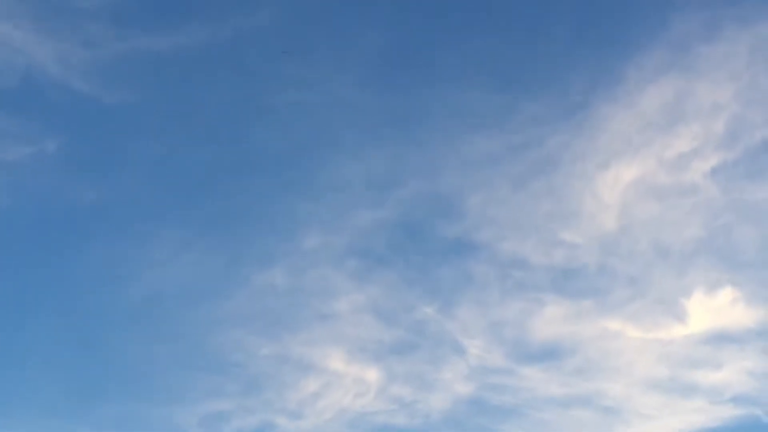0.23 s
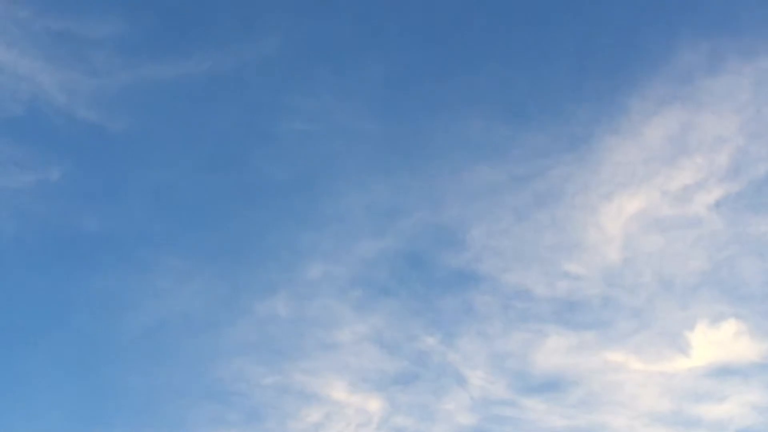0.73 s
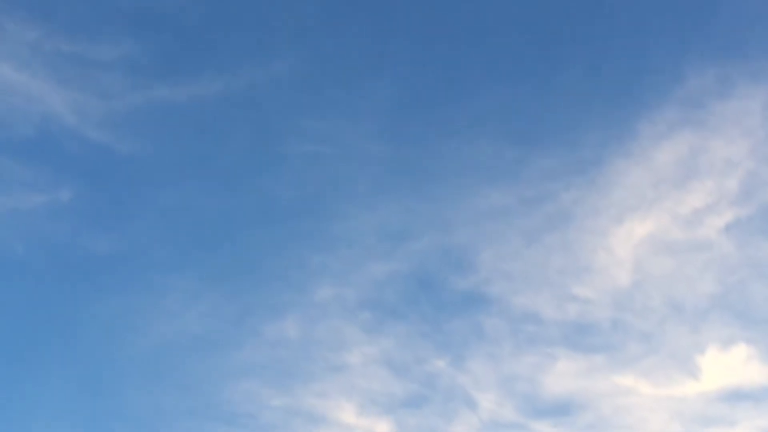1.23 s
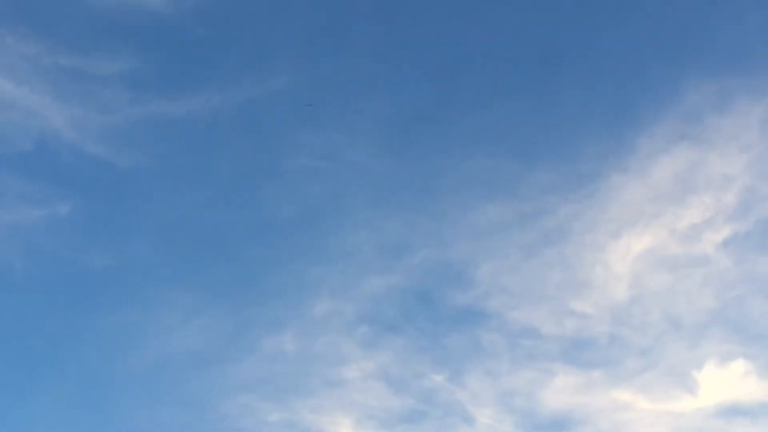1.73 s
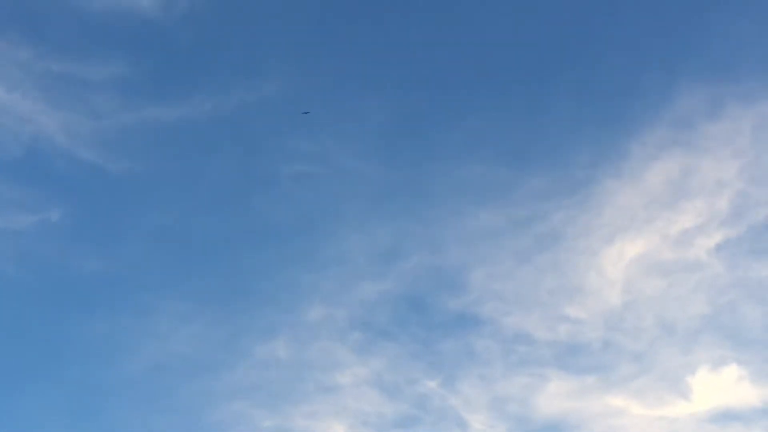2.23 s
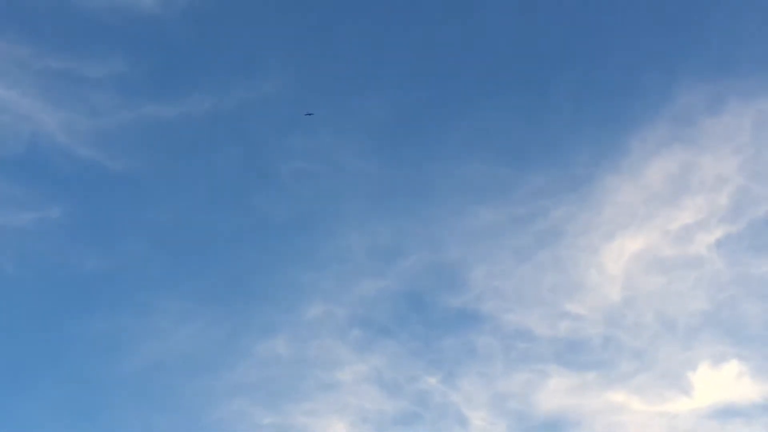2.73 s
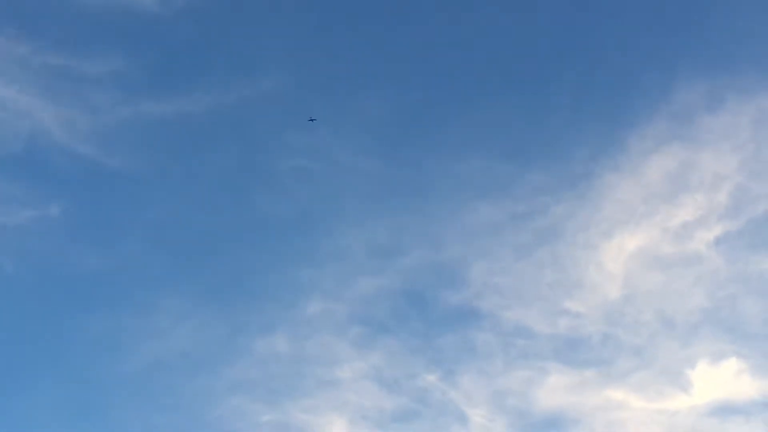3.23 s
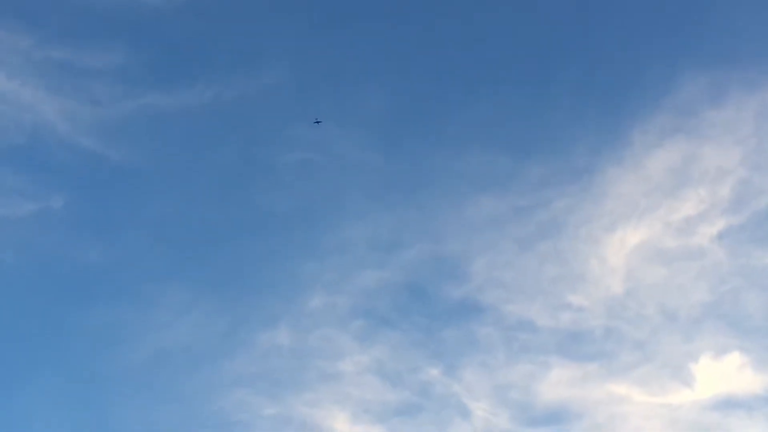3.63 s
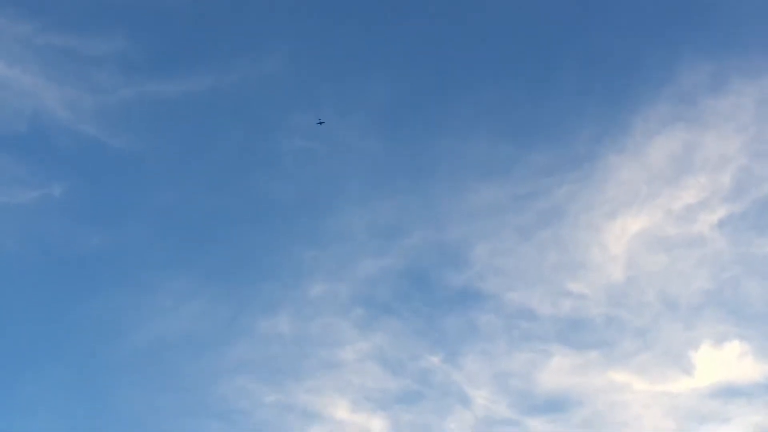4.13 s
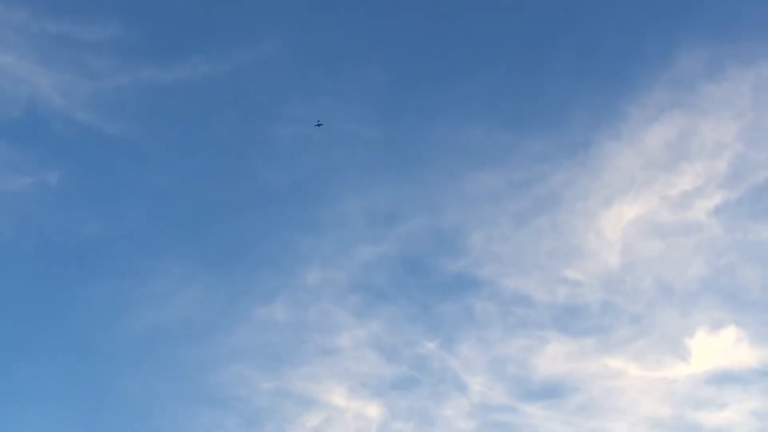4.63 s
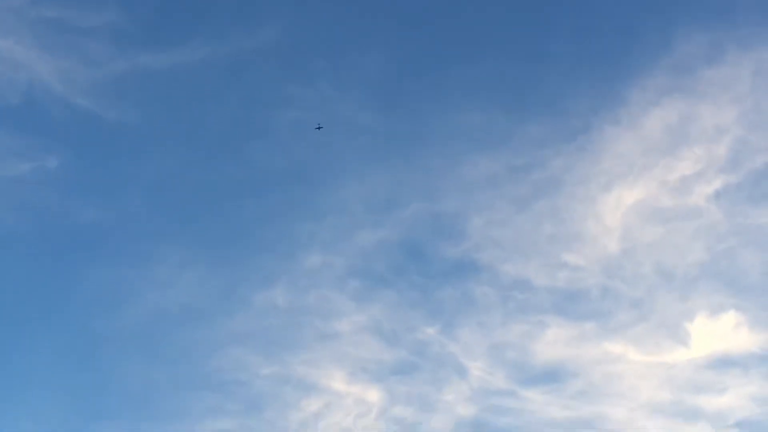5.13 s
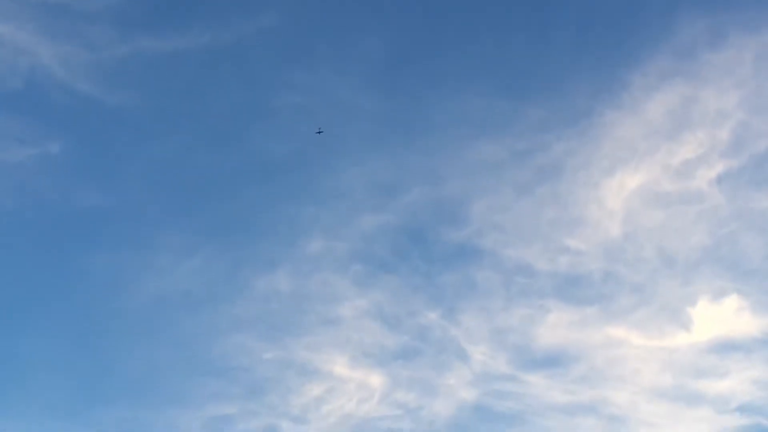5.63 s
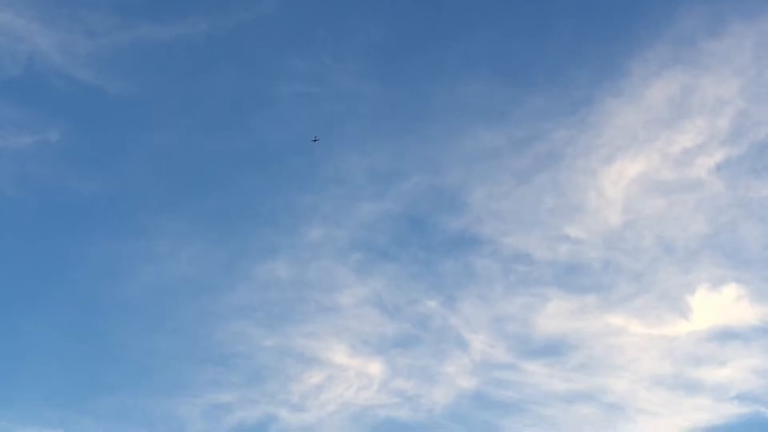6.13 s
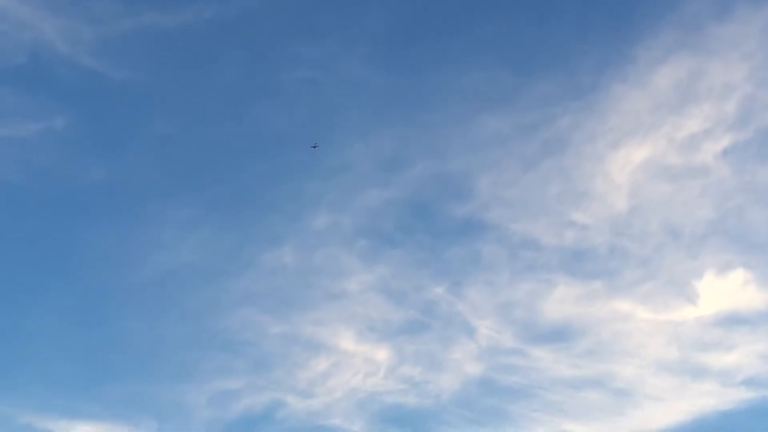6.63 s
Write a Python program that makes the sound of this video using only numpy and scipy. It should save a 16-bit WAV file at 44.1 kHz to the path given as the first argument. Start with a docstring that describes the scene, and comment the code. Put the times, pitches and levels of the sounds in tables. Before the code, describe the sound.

A small piston-engine propeller plane drones high overhead throughout, heard outdoors from the ground. From the start, its low, buzzing note slides steadily down in pitch, over a soft low rush of air from the propeller. Between about 1 and 2.5 seconds the engine swells and turns rougher, with a rapid exhaust crackle, tiny sharp ticks and a sweeping, phasing colour; it is loudest around 2 seconds. From 2.5 to 4.5 seconds the rattling drone wavers in strength, reaching its lowest pitch near 4 seconds. After that the crackle and brightness die away as the plane turns off, leaving a quieter, duller hum that climbs slightly in pitch. The hum is weakest near 6 seconds and comes back a little just before the end, at about 7 seconds. A very faint microphone hiss lies behind it all.

```python
"""Outdoors, far below a six-cylinder, two-blade light aircraft turning high overhead.
Its pitch falls as it swings away, then climbs. Blade and exhaust tones, locked to the shaft, drone
under the crackle of single firings, which uneven air makes come and go. The slipstream rushes low
down, some firings ping or crack out of the drone, and a faint microphone hiss lies above it all."""
import sys
import numpy as np
from scipy import signal
from scipy.fft import rfft, irfft
from scipy.io import wavfile
from scipy.ndimage import uniform_filter1d

SR = 44100
rng = np.random.default_rng(int(sys.argv[2]) if len(sys.argv) > 2 else 0)


def to_wav(s):
    """Save 16-bit WAV."""
    ch = np.atleast_2d(s).T  # columns
    pcm = np.round(np.clip(ch, -1, 1) * 32767)  # PCM
    wavfile.write(sys.argv[1], SR, pcm.astype(np.int16))


N = 303400

# Shaft speed as heard on the ground: (time [s], speed [turns/s]). An order is cycles per turn.
SHAFT_SPEED = [(0.0, 41.898), (0.3, 41.536), (0.6, 40.006), (0.9, 38.609), (1.3, 37.268), (1.7, 35.528),
               (2.1, 34.709), (2.5, 33.76), (3.0, 33.412), (3.5, 33.002), (4.0, 32.829), (4.5, 33.0),
               (5.0, 33.345), (5.5, 33.737), (6.0, 33.963), (6.3, 34.64), (6.6, 34.507), (6.88, 35.143)]
# Firings are sharpest while the pipes face the ground: (time [s], share of noise [0-1])
NOISE_SHARE = [(0, .8), (1.2, .72), (1.6, .5), (2.05, .45), (2.25, .6), (2.5, .45), (4.35, .45), (4.7, .65),
               (6.88, .8)]
# The two lowest tones: (time [s], firing tone at order 3 [dB], blade tone at order 2 [dB])
DRONE = [(0, -37.5, -38), (.17, -38.5, -34.5), (.34, -33, -39.5), (.62, -35.5, -48), (.95, -37, -40.5),
         (1.3, -32, -44), (1.7, -36, -43.5), (2.15, -32, -41.4), (2.5, -34.5, -40), (2.9, -35, -40.5),
         (3.3, -34.5, -45.5), (4, -35.6, -48), (4.5, -38, -47.9), (5, -39, -47.5), (5.55, -44.5, -46.5),
         (6.1, -42.8, -46), (6.5, -38.5, -39.5), (6.88, -39, -41.5)]
# Blade overtones, fading as the propeller turns away: (time [s], order 4 [dB], order 8 [dB])
BLADE_OVERTONES = [(0, -62, -51), (.2, -39.5, -47.5), (.6, -42, -52.5), (1, -36.5, -46),
                   (1.3, -39.5, -39.5), (1.9, -42, -43), (2.4, -51, -50.5), (2.75, -47, -47),
                   (3.1, -50.5, -64), (3.6, -62, -52), (5.9, -72, -53.5), (6.2, -54, -52), (6.88, -57, -55)]
# Overtones of the firing tone: (time [s], order 6 [dB], order 9 [dB], order 12 [dB])
FIRING_OVERTONES = [(0, -44, -56, -55), (.27, -40, -66, -52.5), (.5, -68, -72, -62), (.9, -60, -65.5, -63),
                    (1.3, -52.5, -51, -52), (1.6, -48.5, -45, -45.5), (2, -37.5, -45, -40.5),
                    (2.25, -52.5, -55.5, -47), (2.75, -42.5, -40.5, -50), (3.3, -45, -54.5, -47.5),
                    (3.65, -51.5, -57.5, -51.5), (4, -44.5, -53.5, -50), (4.7, -57.5, -55, -59),
                    (5.4, -54.5, -64, -62), (5.7, -59, -67, -62), (5.95, -62, -81, -81),
                    (6.4, -58, -74, -68.5), (6.88, -60, -79, -64)]
# Other exhaust tones: (order [per turn], offset [dB], lean [0 follows the firing tone, 1 the bark])
EXHAUST_TONES = [(4.5, -14, 0), (7.5, -8.5, 0.31), (10.5, -14, 0.85), (13.5, -11.5, 2), (15, -12.5, 1.67),
                 (16.5, -15.5, 1), (18, -15, 0.99), (19.5, -17, 1.1)]
# Weak tones of unequal cylinders: (order [per turn], level against the firing tone [dB])
UNEVEN_LOW = [(2.5, -27), (3.5, -33.5), (5, -25.5), (5.5, -30), (6.5, -45.5), (7, -26)]
# Weak tones that come and go with the bark: (order [per turn], level against the bark [dB])
UNEVEN_HIGH = [(10, -23.5), (11, -24.5), (11.5, -28.5), (14, -18), (14.5, -33.5), (15.5, -23), (16, -28),
               (17, -22), (17.5, -32), (18.5, -18.5), (21, -28.5), (21.5, -20), (22.5, -20), (24, -25.5),
               (25.5, -27)]
# Strength of each of the six cylinders: (gain [dB])
CYLINDER_DB = (-2, -1, -4, 0, -4.5, 0)
# Colour the pipes give a firing: (frequency [Hz], gain [dB])
PIPE_COLOUR = [(190, -26), (330, -1.5), (367, 2), (396, 15), (431, 5), (500, 13.5), (626, 8.5), (767, -0.5),
               (939, 5), (1140, -5), (1320, -9.5), (1650, -17.5), (2140, -28.5), (4230, -57), (5500, -88.5),
               (9310, -120)]
# Dips that sweep as the aircraft banks and linger as it leaves, a path each: (time [s], centre [Hz])
DIPS = [
    [(1.05, 1410), (1.2, 1965), (1.3, 2650), (1.37, 3300), (1.46, 3820)],
    [(1.38, 1196), (1.5, 1434), (1.56, 1930), (1.62, 2670), (1.67, 3400)],
    [(1.58, 1360), (1.68, 1750), (1.77, 2020), (1.83, 3170)],
    [(1.94, 2830), (2.03, 1930), (2.1, 1260), (2.2, 906), (2.45, 873)],
    [(4.65, 480), (6.88, 463)],
    [(5.25, 790), (6.88, 770)],
    [(4.85, 1210), (5.75, 1148)],
    [(4.6, 1940), (5.2, 1844)],
]
# Bright streaks beside the dips, a path each: (time [s], centre [Hz])
RIDGES = [
    [(1.18, 1380), (1.35, 1860), (1.5, 2590), (1.57, 3150)],
    [(2.03, 3120), (2.12, 2290), (2.22, 1600)],
    [(4.72, 2500), (5.02, 2270)],
    [(4.95, 1480), (5.38, 1366)],
    [(0, 1480), (.9, 1650)],
    [(3.3, 3420), (4.3, 3270)],
    [(4.6, 620), (6.75, 610)],
    [(5.3, 960), (5.7, 940)],
]
# Borders of the five crackle bands, bark, ring, crack, rasp and sizzle: (frequency [Hz])
BAND_EDGES = (330, 800, 1250, 1900, 2700, 4500)
# Midrange at the microphone: (time [s], bark reference level [dB], ring [dB], crack [dB])
MID_LEVELS = [(0, -44.5, -68, -51), (.35, -48, -63.5, -55), (.65, -41.5, -56.5, -62), (.95, -43, -56, -50),
              (1.12, -40.5, -60, -52), (1.32, -39, -61.5, -50.5), (1.55, -38, -46.5, -63.5),
              (1.72, -37, -40.5, -52), (1.88, -35.5, -37, -38.5), (2.05, -34.5, -47, -42),
              (2.3, -43, -51, -50.5), (2.62, -39, -51.5, -44), (2.9, -41.5, -46.5, -51.5),
              (3.15, -40.5, -40.5, -49.5), (3.3, -39, -43, -59), (3.45, -41.5, -46, -60),
              (3.6, -45, -41, -60.5), (3.85, -43, -46, -56.5), (4.17, -43.5, -39.5, -72),
              (4.5, -43, -54.5, -67), (4.85, -50, -58.5, -62), (5.2, -51, -69, -60.5),
              (5.5, -59.5, -60.5, -78), (5.9, -64.5, -78.5, -72), (6.2, -59.5, -77, -78),
              (6.5, -61.5, -79, -92), (6.88, -65.5, -75, -90)]
# Treble at the microphone: (time [s], rasp before its flutter [dB], sizzle [dB])
TREBLE_LEVELS = [(0, -72, -64.5), (.25, -71, -69.5), (.42, -65.5, -66.5), (.65, -79, -68),
                 (.95, -72, -61.5), (1.5, -60.5, -59.5), (1.75, -52.5, -58.5), (2.05, -50, -57),
                 (2.18, -54, -61), (2.38, -51, -72), (2.6, -49.5, -66), (2.85, -56, -81), (3.2, -58.5, -80),
                 (3.42, -64, -65), (3.65, -68.5, -71.5), (3.9, -73, -69.5), (4.3, -68, -82),
                 (4.85, -72, -78.5), (5.3, -91, -83), (6.88, -85, -94)]
# Depth of the brief patches that eddies make: (frequency [Hz], rms swing [dB])
PATCH_DEPTH = [(300, 1.2), (1000, 1.2), (3000, 4)]
# Colour of the slipstream: (frequency [Hz], gain [dB])
RUSH_COLOUR = [(20, -15), (40, -12), (60, -11.5), (100, -0.5), (200, -6), (330, -6.5), (500, -24.5)]
# Slipstream at the microphone: (time [s], level [dB])
RUSH_LEVEL = [(0, -40), (.4, -45), (1, -46.5), (2, -51), (3, -52.5), (4, -58), (5, -50.5), (6, -59),
              (6.3, -70), (6.5, -65), (6.88, -48.5)]
# High pings, mostly two turns apart: (time [s], gain [dB], pitch [Hz])
PINGS = [(0.1017, -53, 3960), (0.1486, -44, 2990), (0.391, -52, 3750), (0.5494, -60, 3640),
         (0.6883, -55, 3440), (0.7716, -44, 2980), (0.9742, -45, 2980), (0.9974, -47.5, 3220),
         (1.049, -42, 3340), (1.1009, -46, 2820), (1.1528, -54, 3220), (1.2092, -44, 3250),
         (1.2615, -40, 3150), (1.3149, -43.5, 3420), (1.3663, -48, 2720), (1.513, -38, 2700),
         (1.5888, -45, 2870), (1.701, -46, 3370), (1.7574, -48, 2780), (1.8108, -44, 3240),
         (1.8706, -42, 3100), (1.9904, -55, 2830), (2.0393, -35.5, 3020), (2.4952, -46, 2980),
         (2.5456, -43, 2660)]
# The hardest firings: (time [s], gain [dB], pitch [Hz])
CRACKS = [(1.44, -24, 674), (1.495, -21, 657), (1.55, -31, 662), (1.623, -20, 970), (1.661, -25, 970),
          (1.791, -17, 900), (1.811, -13.5, 1100), (1.83, -13, 898), (1.849, -17.5, 996),
          (1.906, -12, 1040), (1.963, -12, 1030), (2.02, -14, 930), (2.507, -21, 1030), (2.584, -30, 630),
          (2.664, -25, 660), (3.001, -29, 950), (3.061, -27, 620), (3.121, -30, 626), (3.242, -25, 610),
          (3.483, -30, 620), (3.524, -27, 1000), (3.808, -32, 610), (4.061, -51, 1050), (4.092, -39, 880),
          (4.213, -43, 830), (4.274, -48, 930), (4.335, -22, 625)]
# Colour of the microphone's own noise: (frequency [Hz], gain [dB])
HISS_COLOUR = [(300, -4.5), (1000, 17.5), (2000, 8), (3100, 8), (4400, 4.5), (5000, 2.5), (5700, 5),
               (6700, 3.5), (7700, 0.5), (8400, 2), (9800, 1.5), (10400, -3.5), (11300, 0), (15000, -2),
               (16500, 4)]

TIME = np.arange(N) / SR


def gain_of(db):
    return 10 ** (np.asarray(db) / 20)


def unit_rms(x):
    return x / np.sqrt(np.mean(x ** 2) + 1e-20)


def curves(rows):
    """Every column of a timed table, at every sample."""
    times, *columns = np.transpose(rows)
    return [np.interp(TIME, times, column) for column in columns]


def coloured(x, points):
    """Filters by a spectrum given on a log-frequency axis."""
    corner_hz, db = np.transpose(points)
    hz = np.fft.rfftfreq(N, 1 / SR)
    return irfft(rfft(x) * gain_of(np.interp(np.log(hz + 1), np.log(corner_hz), db, -90, -90)), N)


def drift(hz):
    """Slow random wander of rms 1, up to hz."""
    hop = 200
    steps = rng.standard_normal(N // hop + 402)
    smooth = signal.filtfilt(*signal.butter(2, hz, fs=SR / hop), steps)[200:-200]
    return np.interp(np.arange(N) / hop, np.arange(len(smooth)), unit_rms(smooth))


def shaft_tone(order, db, turns, blur):
    """A sine locked to the shaft, wavering in the moving air; blur shakes orders above ten."""
    phase = 2 * np.pi * order * turns + .41 * (order - 3) ** 2  # higher tones fall out of step
    phase += .13 * np.sqrt(order) * drift(hz=4.7)
    phase += .17 * max(order - 10, 0) * blur * drift(hz=30)
    return np.sqrt(2) * gain_of(db + .74 * drift(hz=7.7)) * np.cos(phase)


def propeller(turns, blur, blade_db):
    """Two blades beat the air twice a turn, with overtones."""
    levels = zip((2, 4, 8), [blade_db, *curves(BLADE_OVERTONES)])
    return sum(shaft_tone(order, db, turns, blur) for order, db in levels)


def exhaust(turns, blur, shaft_hz, firing_db, bark_db, echo=.36, notch_hz=232.7, spacing_hz=110.8):
    """Three firings a turn give a tone and its overtones, with other exhaust tones among them."""
    levels = list(zip((3, 6, 9, 12), [firing_db, *curves(FIRING_OVERTONES)]))
    for order, offset_db, lean in EXHAUST_TONES:
        db = offset_db + lean * bark_db + (1 - lean) * firing_db
        if order > 5:  # an echo combs these, and uneven air slowly fades them
            comb = abs(1 - echo * np.exp(2j * np.pi * (order * shaft_hz - notch_hz) / spacing_hz))
            db += 20 * np.log10(comb) + 1.5 * drift(hz=2)
        levels.append((order, db))
    return sum(shaft_tone(order, db, turns, blur) for order, db in levels)


def unequal_cylinders(turns, blur, firing_db, bark_db, wobble_rad=.6, wobble_db=4):
    """Unequal firings repeat every two turns, adding weak tones at whole and half orders."""
    out = np.zeros(N)
    for table, level_db in ((UNEVEN_LOW, firing_db), (UNEVEN_HIGH, bark_db)):
        for order, db in table:
            phase = 2 * np.pi * (order * turns + rng.random())
            phase += wobble_rad * blur * np.sqrt(order) * drift(hz=10)
            out += np.sqrt(2) * gain_of(level_db + db + wobble_db * drift(hz=2.4)) * np.cos(phase)
    return out


def firings(turns, noise_share, spread_db=1.4, jitter_s=.00005, rattle_s=.003, puff_s=.004):
    """Each firing is a pulse rattling down its cylinder's own pipe, and a short puff of noise."""
    count = np.floor(3 * turns + .3425).astype(int)
    onsets = np.flatnonzero(np.diff(count)) + 1
    spread, jitter = rng.standard_normal((len(onsets), 2)).T
    cylinder = count[onsets] % 6
    onsets = np.clip(onsets + (jitter * jitter_s * SR).astype(int), 0, N - 1)
    trains = np.zeros((6, N))
    trains[cylinder, onsets] = gain_of(np.take(CYLINDER_DB, cylinder) + spread_db * spread)
    t = np.arange(1000) / SR
    pipes = (t == 0) + gain_of(-14) * np.exp(-t / rattle_s) * rng.standard_normal((6, len(t)))
    pipes /= np.linalg.norm(pipes, axis=1)[:, None]
    pulses = -unit_rms(signal.oaconvolve(trains, pipes, axes=1).sum(0)[:N])
    # At this distance the treble arrives scrambled, so only the noise carries it.
    pulses = signal.lfilter(*signal.butter(2, 1700, fs=SR), pulses)
    puffs = unit_rms(signal.oaconvolve(trains.sum(0), np.exp(-t / puff_s))[:N])
    blowing = unit_rms((.6 + puffs) * rng.standard_normal(N))  # never quite stops between puffs
    return coloured(np.sqrt(1 - noise_share) * pulses + np.sqrt(noise_share) * blowing, PIPE_COLOUR)


def uneven_air(hz, t, dip_db=-9.5, ridge_db=5, width_octaves=.17):
    """Gain in dB over frequency and time: eddies open and close patches; dips and ridges glide."""
    patches, streaks = rng.standard_normal((2, len(hz), len(t)))
    patches = uniform_filter1d(uniform_filter1d(patches, size=3, axis=0), size=18)  # brief
    streaks = uniform_filter1d(uniform_filter1d(streaks, size=2, axis=0), size=140)  # long, narrow
    depth_db = np.interp(hz, *np.transpose(PATCH_DEPTH))[:, None]
    air_db = depth_db * unit_rms(patches) + 1.6 * unit_rms(streaks)
    for paths, db in ((DIPS, dip_db), (RIDGES, ridge_db)):
        for path in paths:
            times, centre_hz = np.transpose(path)
            octaves = np.log2((hz[:, None] + 1) / np.interp(t, times, centre_hz))
            active = (t > times[0]) & (t < times[-1])
            air_db += db * np.exp(-(octaves / width_octaves) ** 2) * active
    return air_db


def distant_crackle(source, bark_db, ring_db, crack_db, flutter_db=3, flutter_s=.431):
    """The firings reach the ground through uneven air, each band at its own changing level."""
    rasp_db, sizzle_db = curves(TREBLE_LEVELS)
    rasp_db += flutter_db * np.cos(2 * np.pi * (TIME - 2.586) / flutter_s)
    bands_db = bark_db - 8, ring_db, crack_db, rasp_db, sizzle_db  # the rest of the bark is tones
    frames = dict(fs=SR, nperseg=512, noverlap=384)
    hz, t, spectrum = signal.stft(source, **frames)
    spectrum *= gain_of(uneven_air(hz, t))
    out = np.zeros(N)
    for low, high, db in zip(BAND_EDGES, BAND_EDGES[1:], bands_db):
        passband = 1 / np.sqrt((1 + (low / (hz + 1)) ** 16) * (1 + (hz / high) ** 16))
        _, band = signal.istft(spectrum * passband[:, None], **frames)
        out += gain_of(db) * unit_rms(band[:N])
    return out


def slipstream():
    """Air thrown back by the propeller, a low rush from this far below."""
    return gain_of(curves(RUSH_LEVEL)[0]) * unit_rms(coloured(rng.standard_normal(N), RUSH_COLOUR))


def ringing_firings(events, t60_s, upper_ratio, rise_s=.0014):
    """Single firings ping or crack out of the drone, each a pair of dying partials with a soft start."""
    out, t = np.zeros(N), np.arange(1500) / SR
    envelope = (1 - np.exp(-t / rise_s)) ** 2 * gain_of(-60 * t / t60_s)
    for start_s, db, hz in events:
        lower = np.sin(2 * np.pi * (hz * t + rng.random()))
        upper = np.sin(2 * np.pi * (upper_ratio * hz * t + rng.random()))
        out[round(start_s * SR):][:len(t)] += gain_of(db) * envelope * (lower + .55 * upper)
    return out


def scene():
    """The aircraft as it sounds at one spot on the ground."""
    shaft_hz, noise_share = curves(SHAFT_SPEED)[0], curves(NOISE_SHARE)[0]
    turns = np.cumsum(shaft_hz) / SR
    blur = np.maximum(noise_share - .37, 0)  # noisier firings smear the tones
    firing_db, blade_db = curves(DRONE)
    bark_db, ring_db, crack_db = curves(MID_LEVELS)
    drone = propeller(turns, blur, blade_db)
    drone += exhaust(turns, blur, shaft_hz, firing_db, bark_db)
    drone += unequal_cylinders(turns, blur, firing_db, bark_db)
    crackle = distant_crackle(firings(turns, noise_share), bark_db, ring_db, crack_db)
    rush = slipstream()
    pings = ringing_firings(PINGS, t60_s=.035, upper_ratio=1.08)
    cracks = ringing_firings(CRACKS, t60_s=.018, upper_ratio=1.3)
    return (drone + crackle + rush + pings + cracks)[None]


def record(dry):
    """One microphone with its own faint hiss, a soft start and end, and a band limit."""
    hiss_db, fade_s, top_hz = -72, .004, 15720
    hiss = gain_of(hiss_db) * unit_rms(coloured(rng.standard_normal(N), HISS_COLOUR))
    fade = np.minimum(TIME / fade_s, 1)
    heard = (dry + hiss) * fade * fade[::-1]
    lowpass = signal.firwin(1023, top_hz, window=("kaiser", 9), fs=SR)
    return signal.oaconvolve(heard, lowpass[None], "same")


dry = scene()
out = record(dry)
to_wav(out)
```